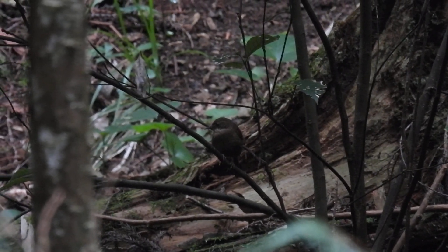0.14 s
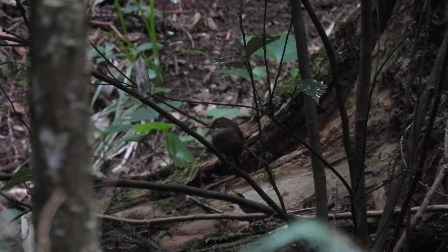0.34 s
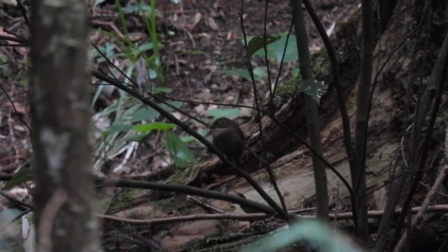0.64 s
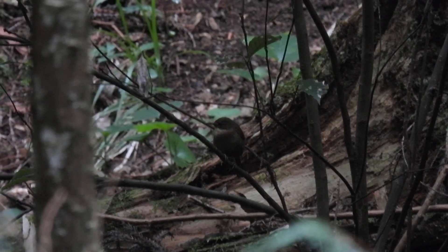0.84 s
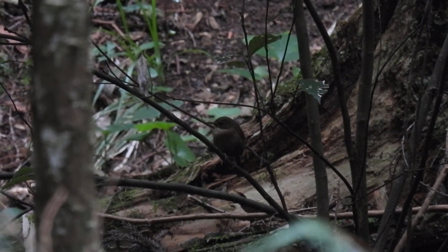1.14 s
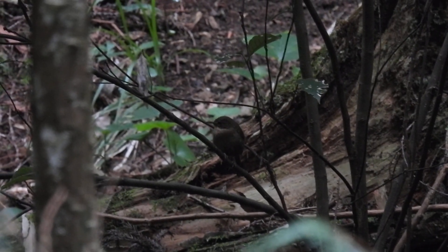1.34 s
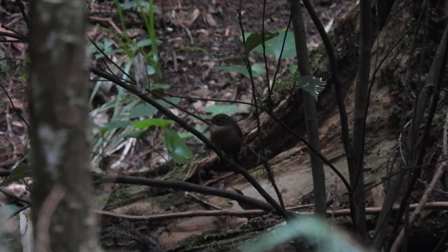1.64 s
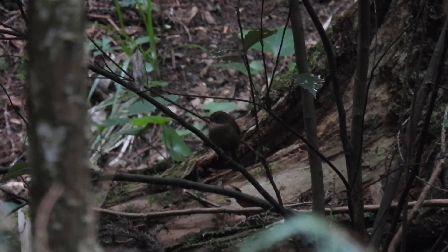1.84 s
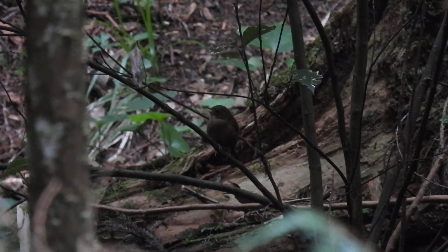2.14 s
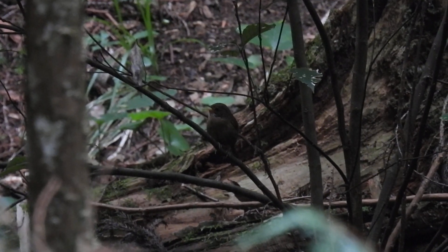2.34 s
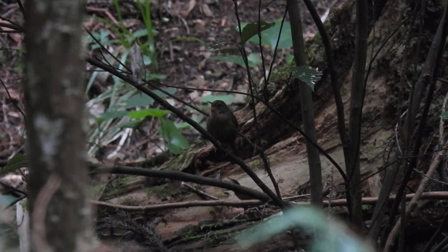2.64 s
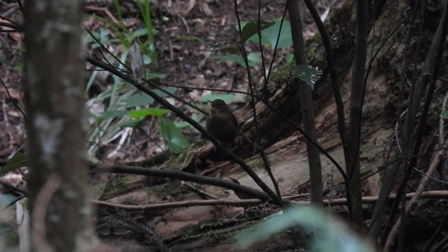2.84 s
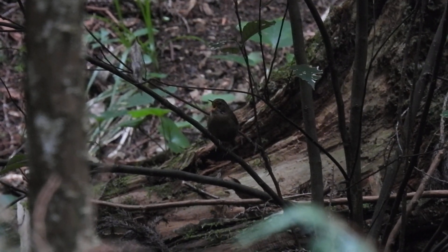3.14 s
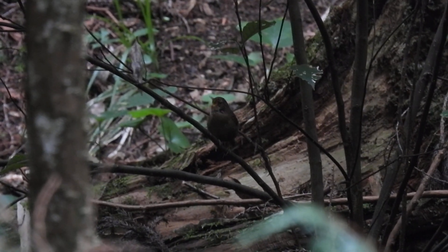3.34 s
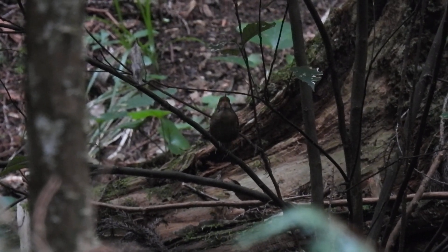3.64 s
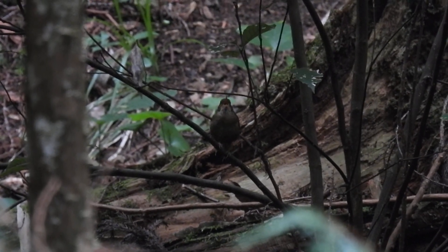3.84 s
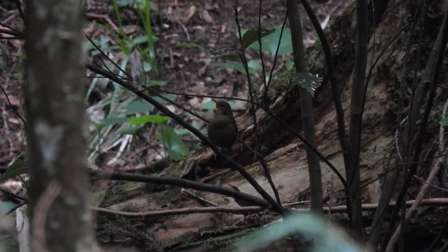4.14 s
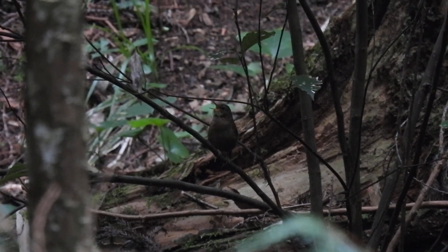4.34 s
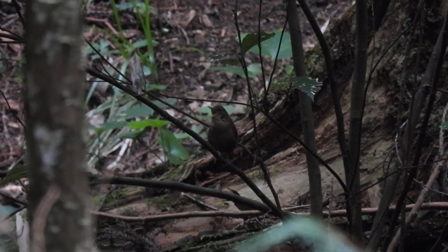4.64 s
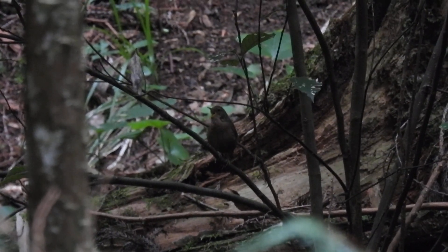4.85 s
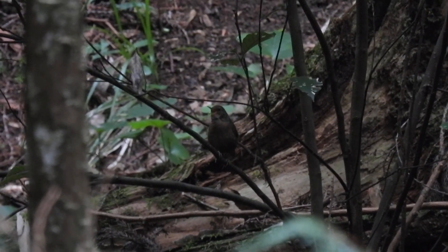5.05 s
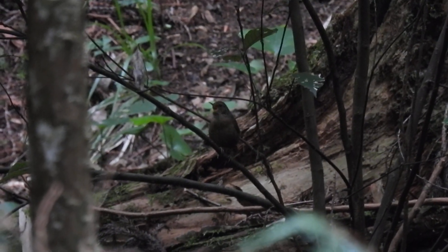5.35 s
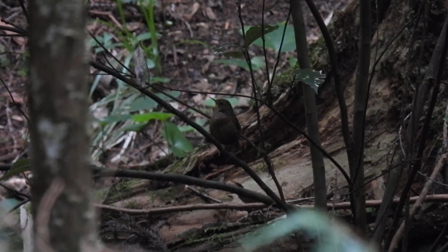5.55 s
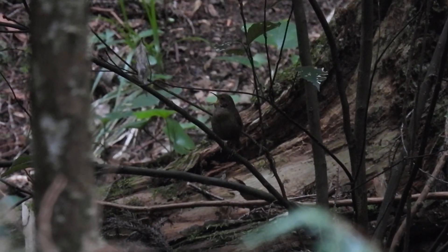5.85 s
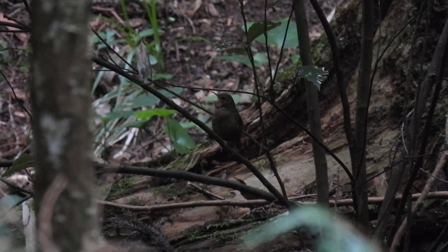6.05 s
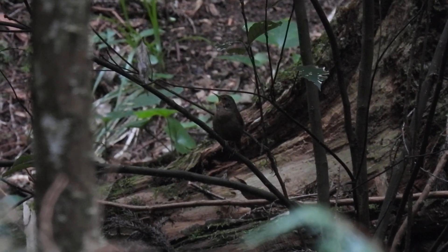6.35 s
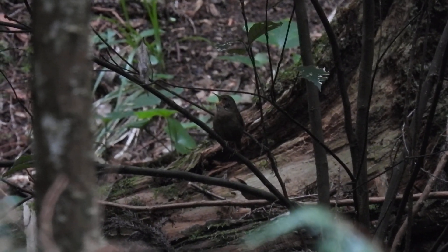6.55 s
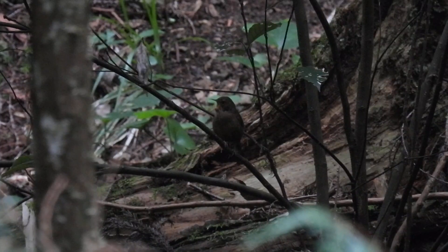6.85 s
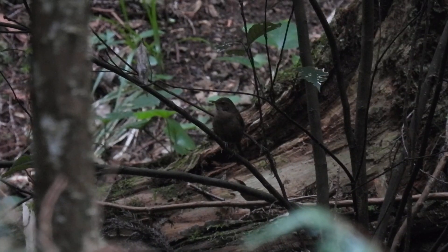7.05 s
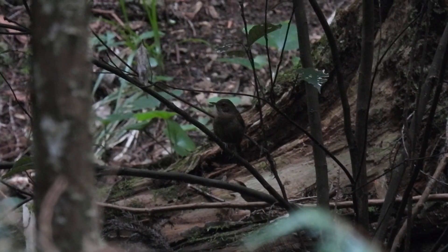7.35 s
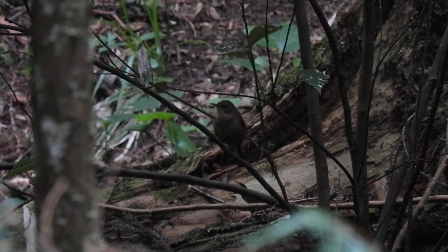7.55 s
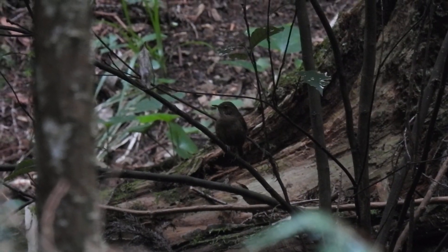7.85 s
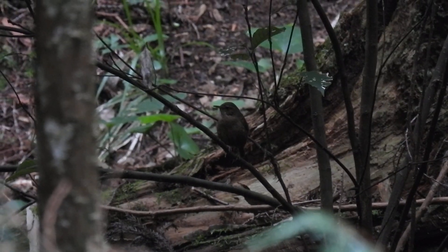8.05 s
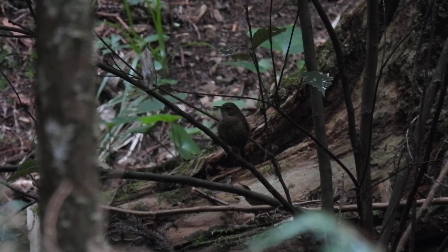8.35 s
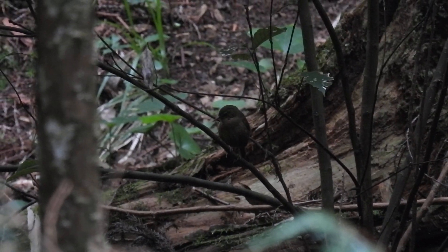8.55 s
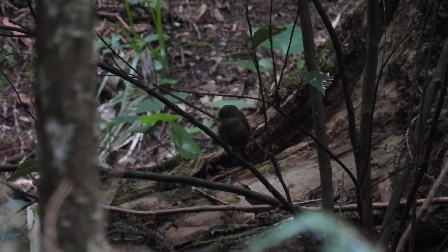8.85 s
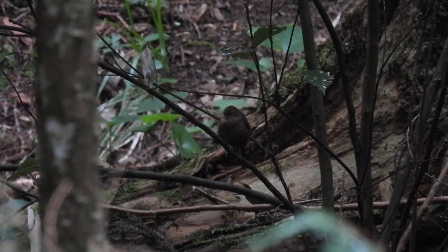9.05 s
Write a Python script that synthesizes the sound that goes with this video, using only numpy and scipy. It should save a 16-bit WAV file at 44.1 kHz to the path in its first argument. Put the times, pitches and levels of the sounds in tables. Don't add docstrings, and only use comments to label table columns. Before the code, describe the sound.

Over a steady watery wash, a tiny bird sings one long rapid high song closing in a trill, then a distant bird calls repeatedly.

```python
import sys
import numpy as np
from scipy import signal
from scipy.fft import rfft, irfft, next_fast_len
from scipy.io import wavfile
from scipy.ndimage import uniform_filter1d

SR = 44100
rng = np.random.default_rng(int(sys.argv[2]) if len(sys.argv) > 2 else 0)


def persist_wave(psi):
    counts = np.round(np.clip(psi, -1, 1) * 32767).astype(np.int16)
    wavfile.write(sys.argv[1], SR, np.atleast_2d(counts).T)


def volts(x):
    e = np.asarray(x, float) / 20
    return 10 ** e


N = 405719

# share of length, share of the slide, level in dB.
GLIDE = [(0, 0.027, -9.5), (.25, .25, -1), (.7, .72, -3.5), (1, 1, -7)]


def evened(x):
    return x / np.sqrt(np.mean(x ** 2) + 1e-20)


def read(points, hz):
    f, value = np.transpose(points)
    return np.interp(np.log(hz + 1), np.log(f + 1), value)


def add(mix, s, sound):
    part = mix[..., round(s * SR):][..., :sound.shape[-1]]
    part += sound[..., :part.shape[-1]]


def stream():
    # frequency in Hz, spectral level in dB.
    wash_spectrum = [(55, -49), (100, -42), (156, -49.5), (268, -6), (424, -4), (533, -5.5), (750, -1.5),
                     (1400, -4), (3200, -9), (5000, -10.5), (8650, -21.5), (10000, -27), (11500, -38),
                     (13000, -40), (14500, -57)]
    # frequency in Hz, side minus mid in dB.
    side_spread = [(60, -9), (120, -16), (240, -14.5), (490, -14.5), (1000, -13), (2010, -6.5), (4060, -3),
                   (8200, 2.5)]
    level_db = -46.5
    frames, hz = N // 256 + 5, np.fft.rfftfreq(1024, 1 / SR)
    a, b, c, d, patches = rng.standard_normal((frames, 513, 5)).T
    patches = uniform_filter1d(patches, size=5, axis=0)
    patches = evened(uniform_filter1d(patches, size=8, axis=1))
    patchy_db = 1.1 + 3.1 / (1 + (hz / 900) ** 2)
    mid = a + 1j * b
    side = (c + 1j * d) * volts(read(side_spread, hz))[:, None]
    colour_db = volts(read(wash_spectrum, hz)[:, None] + patchy_db[:, None] * patches)
    z = np.array([mid + side, mid - side]) * colour_db
    wash = signal.istft(z, nperseg=1024, noverlap=768)[1][:, :N]
    return volts(level_db) * wash / np.sqrt(np.mean(wash.mean(0) ** 2))


def gurgles():
    # start in seconds, peak level in dB, pitch in Hz.
    bubbles = [(0.419, -34, 720), (0.633, -40, 720), (0.7, -37, 422), (0.938, -40, 680), (1.157, -42, 675),
               (2.344, -41, 702), (2.644, -46, 877), (3.541, -44, 786), (3.919, -35, 415),
               (4.011, -37, 400), (4.166, -41, 766), (4.237, -38.5, 854), (4.423, -34.5, 409),
               (4.687, -41, 877), (5.008, -37.5, 625), (5.06, -40, 452), (5.287, -38, 957),
               (5.43, -34, 400), (5.536, -40, 399), (5.625, -40, 830), (5.805, -48, 686), (5.882, -50, 836),
               (6.128, -41, 944), (6.163, -38.5, 700), (6.204, -39, 1005), (6.819, -41, 703),
               (6.968, -48, 764), (6.993, -35, 398), (7.4, -35, 398), (8.343, -36, 440), (9.087, -35, 847),
               (9.149, -32.5, 346)]
    out, t = np.zeros(N), np.arange(5000) / SR
    for s, db, hz in bubbles:
        onset = np.sin(np.pi / 2 * np.minimum(t / 0.0069, 1)) ** 2
        decay = volts(-60 * t / .11)
        ring = np.sin(2 * np.pi * hz * (.97 * t + 1.1 * t ** 2)) * decay * onset
        add(out, s, volts(db - 1.5) * ring)
    return out * volts(np.array([[.4], [-.4]]))


def twig():
    # start in seconds, peak level in dB.
    snaps = [
        (4.6126, -56),
    ]
    out, t = np.zeros(N), np.arange(60) / SR
    for s, db in snaps:
        add(out, s, volts(db + 16.5) * np.sin(2 * np.pi * 9500 * t) * np.exp(-t / 0.00013))
    return out


def forest(x, onset_s, build_s, brush_db=-60):
    # frequency in Hz, t60 in seconds.
    wood_decay = [(2500, 0.62), (4500, 0.77), (6500, 0.73), (9000, 0.16)]
    brush_t60, slope_t60, slope_db = 0.11, 1.19, -11.5
    taps = np.zeros((2, SR))
    at = np.arange(0, SR - 20, 20) + rng.integers(0, 20, (2, SR // 20))[:, :(SR - 1) // 20]
    np.put_along_axis(taps, at, rng.choice([-1., 1.], at.shape), 1)
    taps[1] = 0.098 * taps[0] + 0.95 * taps[1]
    hz, t, z = signal.stft(taps, SR, nperseg=256)
    decay = volts(-60 * t / read(wood_decay, hz)[:, None]) + volts(slope_db - 60 * t / slope_t60)
    tail = signal.istft(z * decay, SR, nperseg=256)[1][:, :SR]
    late = np.maximum(np.arange(SR) / SR - onset_s, 0)
    brush = volts(brush_db - 60 * late / brush_t60) * (late > 0)
    tail *= np.minimum(late / build_s, 1) + brush
    return signal.fftconvolve(x[None], tail / np.linalg.norm(tail[0]), axes=1)[:, :N]


def note(shape, s, length, db, from_hz, to_hz):
    along, slid, shape_db = np.transpose(shape)
    hz = from_hz + (to_hz - from_hz) * slid
    return np.transpose([s + length * np.sort(along), hz, db + shape_db])


def whistle(rows, s=0, db=0, overtones=None, top_hz=12600):
    # multiple of the pitch, level in dB.
    clear_overtones = [(2, -40), (3, -52)]
    if overtones is None:
        overtones = clear_overtones
    at, hz, level_db = np.transpose(rows)
    t = np.arange(at[0] - .003, at[-1] + .003, 1 / SR)
    hz = uniform_filter1d(np.interp(t, at, hz), size=min(len(t) // 9, 350), mode="nearest")
    turn = 2 * np.pi * (np.cumsum(hz) / SR + rng.random())
    tone = np.sin(turn)
    for k, d in overtones:
        tone += volts(d) * np.sin(k * turn) * (k * hz < SR / 2) / (1 + (k * hz / top_hz) ** 14)
    edge = np.clip(np.minimum(t - t[0], t[-1] - t) / min(.006, len(t) / SR / 5), 0, 1)
    breath = volts(db + np.interp(t, at, level_db)) * np.sin(np.pi / 2 * edge) ** 2
    return s + t[0], np.sqrt(2) * breath * tone


def buzz(s, db):
    # start and length in seconds, level in dB, from Hz, to Hz.
    grainy_end = (.17, .1, 0, 3500, 3120)
    # share of length, share of the slide, level in dB.
    fade = [(0, 0, -4), (.12, .1, -.5), (.5, .45, -1.5), (1, 1, -9)]
    pulses_per_s, jitter, grows_s = 170, .5, .025
    start, tone = whistle(note(fade, *grainy_end), s, db)
    uneven = 1 + jitter * evened(uniform_filter1d(rng.standard_normal(len(tone)), size=200))
    depth = np.minimum(np.arange(len(tone)) / SR / grows_s, 1)
    chop = evened(np.maximum(np.cos(2 * np.pi * np.cumsum(pulses_per_s * uneven) / SR), 0))
    return start, tone * (1 - depth + depth * chop)


def far_bird():
    # start in seconds, length in seconds, level in dB, from Hz, to Hz.
    opening = [
        (.378, 0.0073, -45, 4930, 4100),
        (6.863, 0.057, -51, 3920, 3750),
        (6.926, 0.068, -52, 3600, 3315),
        (7.318, 0.059, -39.5, 4310, 4364),
        (7.49, 0.019, -44, 4400, 4290),
    ]
    # time in seconds, pitch in Hz, level in dB.
    whine = [(7.372, 2130, -73), (7.4, 1810, -70), (7.425, 1660, -69), (7.455, 1560, -70),
             (7.472, 1420, -76), (7.49, 1240, -79)]
    # multiple of the pitch, level in dB.
    nasal = [(2, 17), (3, 23), (4, 27), (5, 14)]
    # start in seconds, level in dB, buzz level in dB.
    calls = [
        (7.694, -40.5, -44),
        (8.185, -38.5, -41),
        (8.656, -39, -43.5),
        (9.127, -40, -46),
    ]
    # seconds from its start, pitch in Hz, level in dB.
    sweep = [(0, 4350, -10), (.008, 4150, -7), (.017, 4400, -1), (.022, 5050, 1), (.04, 6000, -8),
             (.062, 6650, -12), (.078, 6980, -15)]
    # seconds from its start, length in seconds, level in dB, from Hz, to Hz.
    flicks = [
        (.076, .007, -2, 3550, 3050),
        (.096, .01, -4, 5300, 4200),
        (.143, .012, -1, 4300, 5800),
        (.1, .045, -19, 2650, 2700),
        (.165, .006, 1, 4000, 5500),
        (.275, .02, -7, 4400, 5700),
        (.3, .006, -7, 4300, 5300),
    ]
    voice = np.zeros(N)
    for row in opening:
        add(voice, *whistle(note(GLIDE, *row)))
    add(voice, *whistle(whine, overtones=nasal, top_hz=6100))
    for *row, buzz_db in calls:
        add(voice, *whistle(sweep, *row))
        add(voice, *buzz(row[0], buzz_db))
        for flick in flicks:
            add(voice, *whistle(note(GLIDE, *flick), *row))
    flutter = uniform_filter1d(rng.standard_normal(N), size=60)
    flutter = evened(uniform_filter1d(flutter, size=60))
    voice *= volts(2.8 * flutter - 1.5)
    heard = voice * volts(np.array([[-.5], [-1.5]]))
    add(heard, .005, voice * volts(np.array([[-11], [-10]])))
    return heard + volts(-1.5) * forest(voice, onset_s=.003, build_s=.03, brush_db=0)


def near_echoes(x):
    # delay in seconds, left level in dB, right level in dB.
    bounces = [
        (.0021, -9.5, -15.5),
        (.0047, -26.5, -12),
        (.0083, -16, -18),
        (0.012, -24.5, -11.5),
    ]
    out = np.zeros((2, N))
    for s, left_db, right_db in bounces:
        add(out, s, x * volts(np.array([[left_db], [right_db]])))
    return out


def singer():
    # share of length, share of the slide, level in dB.
    ease = [(0, 0, -27), (.15, .42, -10.5), (.33, .76, -3.5), (.65, .94, -3), (1, 1, -5)]
    drop_shape = [(0, 0.029, -17), (.38, 0.012, -0.5), (.66, 0.012, -3), (.85, .62, -2), (1, 1, -5.5)]
    swoop = [(0, 0.0065, -10), (.27, .17, -5.5), (.5, .6, 1), (.8, .9, -6), (1, 0.97, -4)]
    dip = [(0, 0, -9.5), (.28, .1, -4), (.5, .6, -.5), (.71, 0.99, -4), (.88, .38, -1.5), (1, -.28, -8)]
    hook = [(0, .01, -17), (.27, .72, -6), (.33, .84, -1), (.55, 0.78, -1.5), (.72, .25, -8),
            (.89, -.4, -8), (1, -2.07, -13.5)]
    arch = [(0, 1.4, -13), (.1, .68, -0.5), (.25, .17, -8.5), (.45, 0.021, -6.5), (.63, .12, -12),
            (.73, .55, -2), (.88, 1, -2.5), (1, 0.94, -14)]
    slump = [(0, 0.038, -11.5), (.2, .08, -7), (.45, .24, -3.5), (.7, .48, -5), (1, 0.96, -3.5)]
    scoop = [(0, 0.11, -19), (.32, .45, -2), (.72, 1, -4), (1, 0.915, -10)]
    sag = [(0, 0.23, -20), (.2, 0.5, -4.5), (.47, 1, -2), (.73, .55, -3.5), (1, 0.28, -9)]
    settle = [(0, 0.016, -29), (.12, 0.44, -13.5), (.29, .78, -3.5), (.56, .91, -9), (.83, .98, 1),
              (1, 0.99, -6)]
    lift = [(0, 0.013, -24), (.14, 0.24, -6), (.4, 0.53, 3), (.86, .74, -2), (1, 0.92, -20)]
    stoop = [(0, 0.049, -14), (.45, 0.17, -3.5), (.82, .95, 0), (1, 0.96, -18)]

    # start in seconds, length in seconds, level in dB, from Hz, to Hz.
    glides = [(2.453, 0.018, -40.5, 4900, 3980), (2.503, 0.019, -36.5, 5160, 5350),
              (2.665, .055, -32, 7490, 8540), (2.763, .045, -28.5, 7580, 8630),
              (3.395, .016, -32, 7780, 8080), (4.194, 0.021, -29, 4064, 3694),
              (4.246, .016, -26, 4410, 4470), (4.83, 0.018, -21.5, 5900, 5440),
              (5.008, 0.021, -25.5, 6130, 5670), (5.29, .057, -23.5, 4260, 4465),
              (5.862, .02, -24.5, 4650, 4796), (5.905, .018, -25, 4306, 4030)]
    eases = [
        (2.24, 0.1, -41, 6340, 6100),
        (4.299, 0.031, -21.5, 8270, 7190),
        (4.606, 0.076, -26.5, 4160, 4437),
    ]
    drops = [
        (4.378, 0.11, -23.5, 6320, 5380),
    ]
    swoops = [
        (4.077, .079, -20, 5520, 3920),
        (5.393, .087, -20.5, 5475, 3974),
    ]
    dips = [
        (3.523, .078, -22, 5570, 4150),
        (3.794, .084, -21.5, 5490, 4127),
    ]
    hooks = [
        (3.642, 0.09, -21, 6410, 5600),
        (3.922, 0.082, -21, 6440, 5646),
    ]
    arches = [
        (4.72, .096, -23, 6400, 5250),
        (4.897, .101, -23.5, 6430, 5217),
    ]
    slumps = [
        (5.105, .107, -20, 4640, 3986),
        (5.783, .057, -20, 5004, 4150),
    ]
    scoops = [
        (2.365, 0.075, -37, 6630, 6190),
        (2.548, 0.065, -29.5, 5370, 4846),
        (3.4, 0.054, -22.5, 8170, 7670),
        (6.18, 0.059, -21, 5410, 4754),
    ]
    sags = [
        (2.85, 0.074, -23, 5827, 5608),
    ]
    settles = [
        (5.978, .146, -21.5, 9060, 7164),
    ]
    lifts = [
        (3.215, 0.12, -24, 6490, 7200),
    ]
    stoops = [
        (4.532, .053, -22.5, 4416, 4063),
    ]
    # time in seconds, pitch in Hz, level in dB.
    climb = [(5.56, 6960, -55), (5.575, 7130, -49), (5.59, 7750, -27), (5.63, 7916, -25), (5.66, 8380, -31),
             (5.7, 8330, -27.5), (5.713, 8830, -33)]

    # peak time in seconds, level in dB.
    low_flicks = [(6.272, -23.5), (6.358, -28), (6.443, -26), (6.521, -27.5), (6.603, -25.5),
                  (6.683, -25.5), (6.767, -25), (6.849, -25), (6.93, -26), (7.014, -27.5)]
    # peak time in seconds, level in dB.
    high_flicks = [(6.317, -26), (6.399, -26.5), (6.484, -25.5), (6.563, -27), (6.642, -28), (6.726, -28),
                   (6.807, -28.5), (6.892, -28.5), (6.971, -30), (7.058, -28.5)]
    # peak time in seconds, level in dB.
    ticks = [(2.959, -42), (2.99, -44), (3.024, -42.5), (3.057, -43), (3.092, -42.5), (3.124, -46),
             (3.158, -41.5)]
    # seconds from the peak, pitch in Hz, level in dB.
    low_shape = [(-.009, 5050, -30), (-.005, 5600, -10), (0, 5830, 1.5), (.007, 5980, -8),
                 (.012, 6030, -14)]
    high_shape = [(-.022, 6420, -25), (-.012, 6405, -2), (-.004, 6700, 2), (0, 7220, 1), (.003, 7850, -6.5)]
    tick_shape = [(-.003, 4250, -7), (0, 4900, 0), (.002, 5400, -4), (.005, 6200, -11)]

    # frequency in Hz, level in dB.
    pickup = [(3900, -.5), (4500, 0), (5200, 2.6), (5800, -0.5), (6300, -0.5), (7000, -1.2), (7700, -0.3),
              (8500, -1.4)]
    # frequency in Hz, left minus right in dB.
    lean = [(3900, -1), (4600, 7), (5200, 5), (5800, 11), (6400, -4), (7000, -7), (7600, 1), (8300, -0.5)]

    voice = np.zeros(N)
    phrase = [(GLIDE, glides), (ease, eases), (drop_shape, drops), (swoop, swoops), (dip, dips),
              (hook, hooks), (arch, arches), (slump, slumps), (scoop, scoops), (sag, sags),
              (settle, settles), (lift, lifts), (stoop, stoops)]
    for shape, rows in phrase:
        for row in rows:
            add(voice, *whistle(note(shape, *row)))
    add(voice, *whistle(climb))
    for shape, rows in [(low_shape, low_flicks), (high_shape, high_flicks), (tick_shape, ticks)]:
        for row in rows:
            add(voice, *whistle(shape, *row))
    size = next_fast_len(N)
    hz = np.fft.rfftfreq(size, 1 / SR)
    ears_db = read(pickup, hz) + np.array([[.5], [-.5]]) * read(lean, hz)
    direct = irfft(rfft(voice, size) * volts(ears_db), size)[:, :N]
    centre = direct.mean(0)
    reverb = forest(centre, onset_s=0.0006, build_s=0.026, brush_db=4)
    return volts(-0.4) * direct + near_echoes(centre) + volts(-5.5) * reverb


def scene():
    return singer() + far_bird() + stream() + gurgles() + twig()


def top_cut(x):
    return signal.sosfilt(signal.butter(12, 15600, fs=SR, output="sos"), x)


def record(dry):
    return top_cut(dry)


dry = scene()
out = record(dry)
persist_wave(out)
```